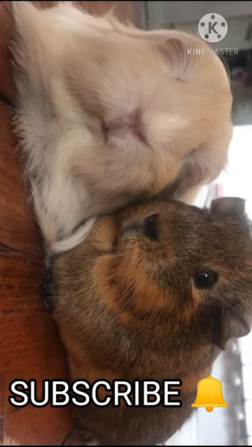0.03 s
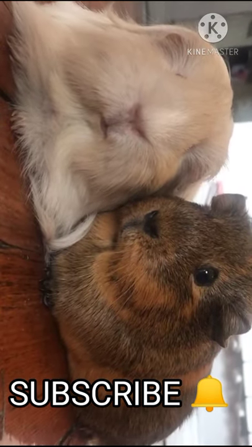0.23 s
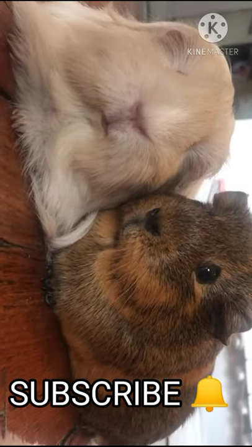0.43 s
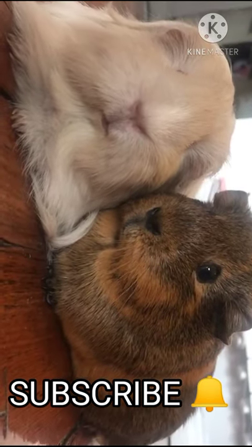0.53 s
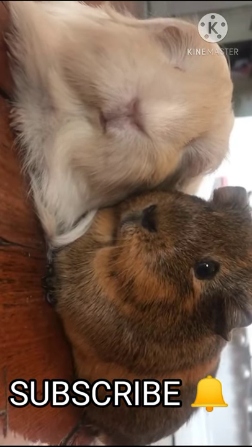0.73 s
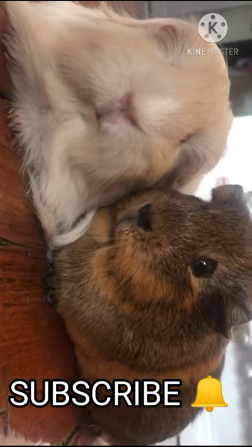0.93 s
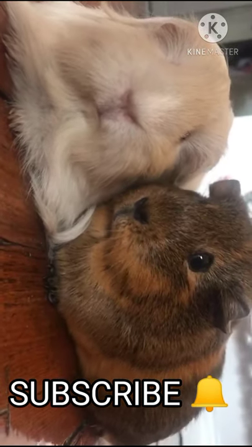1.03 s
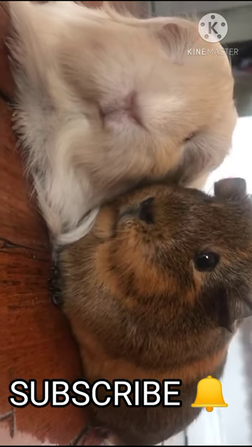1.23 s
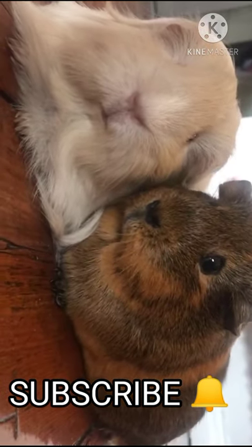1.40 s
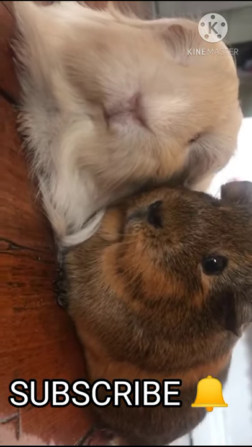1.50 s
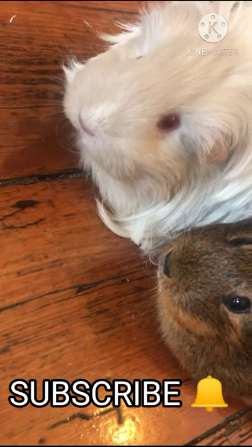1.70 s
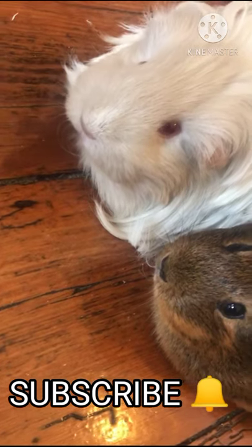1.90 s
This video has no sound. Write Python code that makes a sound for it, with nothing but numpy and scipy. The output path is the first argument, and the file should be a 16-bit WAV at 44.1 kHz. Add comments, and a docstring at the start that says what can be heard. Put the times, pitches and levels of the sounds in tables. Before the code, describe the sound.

A guinea pig gives three harsh whines close by, breaking between growls and squeaks, at about 0.3-0.6, 0.8-1.0 and 1.3-1.7 seconds. Another whimpers softly from 0.1 seconds on. Faint fur brushing fills the gaps, with tiny ticks and two light bumps on wood around 1.0-1.2. The sound cuts out at 1.7, mid-whine; faint room hiss and hum fade back in at 1.8 with one soft bump.

```python
"""Two guinea pigs huddle on a wooden floor, close by, over faint room hiss and hum.
One whimpers softly, then the other complains in three harsh whines. Its voice is a stream of air
pulses ringing in the throat: it breaks into a growl an octave down and leaps into pure squeaks.
Between the whines come more whimpers, brushing fur, tiny ticks and bumps on the boards.
The sound cuts out during the third whine, then the room fades back in with a last soft bump."""
import sys
import numpy as np
from scipy import signal
from scipy.fft import rfft, irfft, next_fast_len
from scipy.io import wavfile
from scipy.ndimage import uniform_filter1d

SR = 44100
rng = np.random.default_rng(int(sys.argv[2]) if len(sys.argv) > 2 else 0)


def dump_mix(stems):
    """Bounce the given channels to the path in sys.argv[1] as a 16-bit WAV at rate SR."""
    frames = np.atleast_2d(stems).T  # one column per channel
    limited = np.clip(frames, -1, 1)  # hard clip at full scale
    pcm = np.round(limited * 32767).astype(np.int16)
    wavfile.write(sys.argv[1], SR, pcm)


N = 85995
T = np.arange(N) / SR
CUT_S, BACK_S, FADE_S = 1.671, 1.7843, 0.052  # the sound cuts out, comes back, fades in

# how strongly the throat and nose pass each frequency: f/Hz, gain/dB
THROAT = [(100, -35), (210, -5.5), (300, -2.5), (430, -3), (620, 1), (900, 0), (1120, 0), (1380, -10),
          (1600, -14), (1950, -29), (2500, -21), (2850, -23.5), (3350, -31), (3900, -45), (4800, -65.5),
          (10000, -75.5)]


def whines():
    """Three long complaints, rough where they growl and nearly pure where they leap up."""
    # the tune of each whine: t/s, pitch/Hz, growl (0 = clear, 1 = every second pulse drops out)
    tunes = [
        [(.280, 676, 0.92), (.287, 769, 0.42), (.295, 1064, 0), (.302, 1188, 0), (.315, 1090, 0),
         (.326, 815, 0.13), (.335, 522, 0.93), (.349, 559, 1), (.364, 677, 0.85), (.373, 928, 0),
         (.385, 1129, 0.09), (.396, 1025, 0), (.408, 1022, 0), (.422, 762.3, 0.06), (.441, 668, 0.2),
         (.449, 754, 0.6), (.467, 711.5, 0.53), (.480, 663, 0.62), (.494, 700, 0.26), (.512, 506.4, 0.13),
         (.526, 581.3, 0.45), (.549, 707.2, 0.33), (.570, 676, 0.19), (.596, 380.6, .1)],
        [(.788, 679.2, 0.65), (.799, 621.2, 0.35), (.815, 545, 0.48), (.826, 526.6, 0.91), (.834, 1008, 0),
         (.845, 1438, 0.06), (.857, 1015, 0.04), (.867, 587.1, 0.4), (.873, 447, 0.97), (.897, 582.5, 0.9),
         (.917, 650.8, 0.98), (.927, 892.3, 0.13), (.936, 1223, 0.14), (.949, 1006, 0), (.965, 652.5, 0.16),
         (.975, 471.4, 0.89), (.987, 464.6, 0.58), (.999, 611.6, 0.6), (1.013, 637.8, 0.95), (1.026, 724.8, .6),
         (1.035, 639, 0.46), (1.041, 499.1, 0.2)],
        [(1.319, 480, 1), (1.334, 551.1, 0.8), (1.350, 510, 0.89), (1.362, 617.4, 0.72), (1.368, 1087, 0),
         (1.378, 1499, 0.03), (1.386, 1233, 0.05), (1.395, 770.2, 0.12), (1.405, 557, 0.34), (1.414, 449, 0.55),
         (1.432, 540, 0.98), (1.447, 543.3, 0.75), (1.472, 760, 0.82), (1.490, 680, 0.97), (1.502, 699, 0.74),
         (1.516, 670.3, 0.53), (1.529, 561.8, 0.89), (1.545, 623.6, .8), (1.556, 631.6, 0.83),
         (1.568, 604, 0.22), (1.596, 583, 0.63), (1.615, 450, 0.21), (1.634, 431, 0.21), (1.647, 396.4, 0.63),
         (1.671, 479, 0.69)],
    ]
    # the loudness of each whine: t/s, level/dB, brightness/dB (more means stronger overtones)
    effort = [
        [(0.284, -50.5, -15), (0.292, -44.5, -22), (0.316, -41, -26.5), (0.332, -52.5, -14), (0.4, -41.5, -25),
         (0.432, -49.5, -17.5), (0.494, -45.5, -17.5), (0.512, -48.5, -18), (0.572, -45.5, -18.5),
         (0.586, -47.5, -26), (0.596, -61, -16.5)],
        [(0.793, -48.5, -16.5), (0.853, -40.5, -17.5), (0.885, -51, -13), (0.949, -40.5, -16.5),
         (0.979, -47.5, -16.5), (1.021, -43, -15), (1.038, -45.5, -17.5)],
        [(1.323, -49, -9.5), (1.329, -47, -17.5), (1.385, -45, -13), (1.391, -44.5, -28.5),
         (1.411, -47.5, -16.5), (1.635, -48.5, -16.5), (1.668, -53.5, -16)],
    ]
    # unevenness as a share of the pitch, one per whine: it grows as the voice tires
    jitters = [.004, .007, .017]
    attack_s, release_s, growl_jitter = 0.0024, 0.003, 0.028
    pitch, growl = in_time(np.vstack(tunes))
    level_db, bright_db = in_time(np.vstack(effort))
    spans = [(tune[0][0], tune[-1][0]) for tune in tunes]
    jitter = sum(share * ((T >= start) & (T <= end)) for share, (start, end) in zip(jitters, spans))
    body, overtones, air = voice(pitch, growl, jitter + growl_jitter * growl ** 4)
    sounding = sum(gate(start, end + release_s, attack_s, release_s) for start, end in spans)
    highs = from_db(bright_db - 0.5) * (overtones + from_db(-17.5) * air)
    return sounding * from_db(level_db) * (body + highs)


def voice(pitch, growl, jitter):
    """Pulses and puffs of air ring in the throat. Gives body, hoarse overtones and hiss at level 1."""
    # the tone of the thin air hiss: f/Hz, gain/dB
    air_tone = [(3500, -26.5), (5000, -9), (6500, -5.5), (7400, 1.5), (8400, 1), (9500, -9), (12000, -12)]
    puff_s, split_hz = 0.0014, 1940
    pulses = throat_pulses(pitch, growl, jitter)
    # each pulse lets out a puff of noise that dies away quickly
    puffs = signal.lfilter([1], [1, -np.exp(-1 / (puff_s * SR))], pulses) * rng.standard_normal(N)
    rasp = colour(puffs, THROAT)
    buzz = signal.sosfilt(signal.butter(2, 130, "high", fs=SR, output="sos"), pulses)
    sound = colour(buzz, THROAT) + from_db(-16) * growl ** 4 * rasp
    overtones = treble(sound, split_hz, order=6)
    body = throat_ring(sound - overtones)
    hoarseness = from_db(-11) + from_db(-10) * growl  # always some noise, more in a growl
    hoarse = evened(overtones) + hoarseness * evened(treble(rasp, split_hz, order=6))
    return evened(body), evened(hoarse), evened(colour(puffs, air_tone))


def throat_pulses(pitch, growl, jitter):
    """One pulse per cycle. A growl weakens every second one, so the voice drops an octave."""
    cycles = np.cumsum(pitch * (1 + jitter * wobble(rate_hz=500))) / SR
    at = np.flatnonzero(np.diff(np.floor(cycles)) > 0)  # the last sample of each cycle
    every_second = np.arange(len(at)) % 2
    uneven_db = 1.3 * growl[at] ** 2 * rng.standard_normal(N)[at]
    strength = (1 - growl[at] * every_second) * from_db(uneven_db)
    # a pulse falls between two samples, so they share it
    late = (np.ceil(cycles[at]) - cycles[at]) / (cycles[at + 1] - cycles[at])
    pulses = np.zeros(N)
    pulses[at] += strength * (1 - late)
    pulses[at + 1] += strength * late
    return pulses


def throat_ring(x):
    """The throat rings on after each pulse, spreading it in time (allpass filters)."""
    # the bands that the ringing delays: f/Hz, width/Hz
    bands = [(800, 660), (1250, 760)]
    for hz, width_hz in bands:
        decay = np.exp(-np.pi * width_hz / SR)
        feedback = np.array([1, -2 * decay * np.cos(2 * np.pi * hz / SR), decay ** 2])
        x = signal.lfilter(feedback[::-1], feedback, x)
    return x


def throat_catches():
    """The throat snaps open once before each whine starts."""
    # single throat pulses: t/s, level/dB
    snaps = [(0.2366, -40), (0.7757, -41), (1.3056, -39.5)]
    clicks = np.zeros(N)
    for start, db in snaps:
        clicks[int(start * SR)] = from_db(db)
    click_peak = np.abs(colour(signal.unit_impulse(N), THROAT)).max()
    return throat_ring(colour(clicks, THROAT)) / click_peak


def whimpers():
    """The second animal makes short, clear notes: the same kind of voice with no growl."""
    # soft notes: start/s, length/s, first pitch/Hz, middle pitch/Hz, last pitch/Hz, level/dB
    notes = [(0.113, 0.032, 470, 520.4, 555.7, -63), (.181, .048, 629.3, 573.6, 599.3, -56.5),
             (.224, 0.027, 602, 629, 608, -57), (0.25, .034, 625, 604, 624, -46.5),
             (0.285, 0.031, 597.4, 597, 600, -56.5), (0.647, 0.03, 590, 620, 632, -57),
             (.733, 0.052, 555.3, 566, 662, -58.5), (1.040, 0.019, 712, 727, 640, -62.5),
             (1.096, 0.016, 711, 657.5, 645, -58), (1.176, 0.019, 575, 580.4, 594, -57),
             (1.535, .12, 785.8, 739, 710, -54)]
    pitch, envelope = np.full(N, 600.), np.zeros(N)
    for start, length, first_hz, middle_hz, last_hz, db in notes:
        glide, = in_time([(start, first_hz), (start + length / 2, middle_hz), (start + length, last_hz)])
        pitch = np.where(T >= start, glide, pitch)
        envelope += from_db(db) * gate(start, start + length, attack_s=0.0042, release_s=0.0042)
    body, overtones, _ = voice(pitch, growl=np.zeros(N), jitter=0.0082)
    return envelope * (body + from_db(-24) * overtones)


def bumps():
    """The floorboards ring briefly with one dull note at each bump."""
    # soft knocks: t/s, level/dB, f/Hz, time to fade by 60 dB/s
    knocks = [(1.0825, -47.5, 370, 0.071), (1.2, -50, 750, .02), (1.842, -58, 296, 0.036),
              (1.838, -59, 184, 0.11)]
    boards = np.zeros(N)
    for start, db, hz, fade_s in knocks:
        age = np.maximum(T - start, 0)
        boards += from_db(db - 60 * age / fade_s) * np.sin(2 * np.pi * hz * age)
    return boards


def ticks():
    """Tiny bright ticks, each a very short burst of high noise."""
    # noise bursts: t/s, level before the lows are cut/dB
    bursts = [(1.022, -57.5), (1.041, -70), (1.059, -65), (1.074, -57)]
    decay_s = 0.0016
    envelope = sum(from_db(db) * (T >= s) * np.exp(-np.abs(T - s) / decay_s) for s, db in bursts)
    return envelope * treble(rng.standard_normal(N), hz=8500)


def shuffles():
    """Fur brushes against fur between the whines, making a soft, low noise."""
    # brushing movements: start/s, length/s, level/dB
    strokes = [(0.596, 0.061, -67), (1.045, .13, -72)]
    # the tone of rubbing fur: f/Hz, gain/dB
    fur_tone = [(100, -25), (350, 2.5), (700, 3), (1100, -6.5), (1800, -21.5), (6000, -31)]
    edge_s = 0.024
    envelope = sum(from_db(db) * gate(s, s + length, edge_s, edge_s) for s, length, db in strokes)
    return envelope * rms_one(colour(rng.standard_normal(N), fur_tone))


def room_echo(x):
    """Many reflections from the room blend into a faint, short tail."""
    delay_s, fade_s = 0.0056, 0.2
    tail = rng.standard_normal(N) * from_db(-60 * T / fade_s) * (T > delay_s)
    tail /= np.sqrt(np.sum(tail ** 2))
    return from_db(-20) * signal.fftconvolve(x, tail)[:N]


def background():
    """Room hiss and rumble with mains hum. The hiss is duller once the sound is back."""
    # the tone of the room noise: f/Hz, gain/dB
    hiss_tone = [(22, -20), (50, 4), (100, -1.5), (160, -1.5), (250, -6), (500, -12), (1000, -15),
                 (2000, -23.5), (4000, -25.5), (5000, -28), (8000, -29), (12000, -33.5)]
    hiss = from_db(-68) * rms_one(colour(rng.standard_normal(N), hiss_tone))
    lost_treble = (T > CUT_S) * (1 - from_db(-2)) * treble(hiss, hz=397)
    hum = from_db(-77.5) * np.sqrt(2) * np.sin(2 * np.pi * 100 * T)
    return hiss - lost_treble + hum


def from_db(db):
    """Turn decibels into a number to multiply by."""
    return 10 ** (np.asarray(db) / 20)


def rms_one(x):
    """Scale a sound so its average level (rms) is 1."""
    return x / np.sqrt(np.mean(x ** 2) + 1e-20)


def evened(x):
    """Hold the level at 1 from moment to moment."""
    power = uniform_filter1d(uniform_filter1d(x ** 2, size=260), size=260)
    return x / np.sqrt(np.abs(power) + 1e-12)


def in_time(rows):
    """Join rows of (time, values) with straight lines: one curve per value column."""
    times, *columns = np.transpose(rows)
    return [np.interp(T, times, column) for column in columns]


def gate(start, end, attack_s, release_s):
    """Fade in, hold and fade out, in straight lines."""
    return np.clip((T - start) / attack_s, 0, 1) * np.clip((end - T) / release_s, 0, 1)


def wobble(rate_hz):
    """A random curve that wanders by about 1 either side of zero."""
    return np.interp(T * rate_hz, np.arange(N), rng.standard_normal(N))


def treble(x, hz, order=2):
    """Keep the part above a frequency, without delaying it."""
    return signal.sosfiltfilt(signal.butter(order, hz, "high", fs=SR, output="sos"), x)


def colour(x, points):
    """Shape the tone of a sound to follow points of f/Hz, gain/dB."""
    size = 2 * next_fast_len(N)
    hz, db = np.transpose(points)
    grid_hz = np.maximum(np.fft.rfftfreq(size, 1 / SR), 1)
    gain = from_db(np.interp(np.log(grid_hz), np.log(hz), db))
    # make the filter ring only after a sound, never before it (minimum phase)
    cepstrum = irfft(np.log(gain))
    cepstrum[1:size // 2] *= 2
    cepstrum[size // 2 + 1:] = 0
    return irfft(rfft(x, size) * np.exp(rfft(cepstrum)))[:N]


def scene():
    """Both animals in the room, on one channel."""
    animals = whines() + whimpers() + throat_catches() + bumps() + ticks() + shuffles()
    return (animals + room_echo(animals) + background())[None]


def record(dry):
    """The sound cuts out and fades back in; everything above 12 kHz is removed."""
    cut_out = np.clip((CUT_S - T) / 0.00049, 0, 1)
    fade_in = np.clip((T - BACK_S) / FADE_S, 0, 1) ** 2
    low_pass = signal.ellip(10, .1, 70, 12000, fs=SR, output="sos")
    return signal.sosfilt(low_pass, dry * (cut_out + fade_in))


dry = scene()
out = record(dry)
dump_mix(out)
```